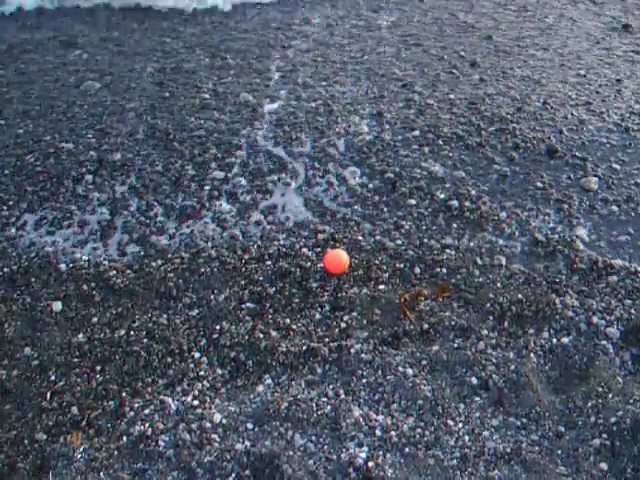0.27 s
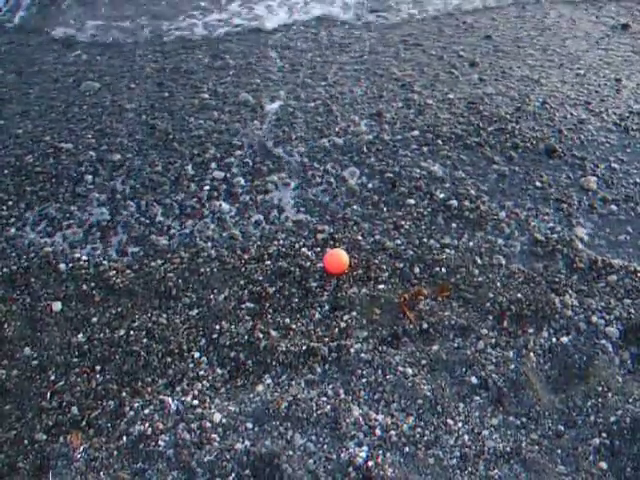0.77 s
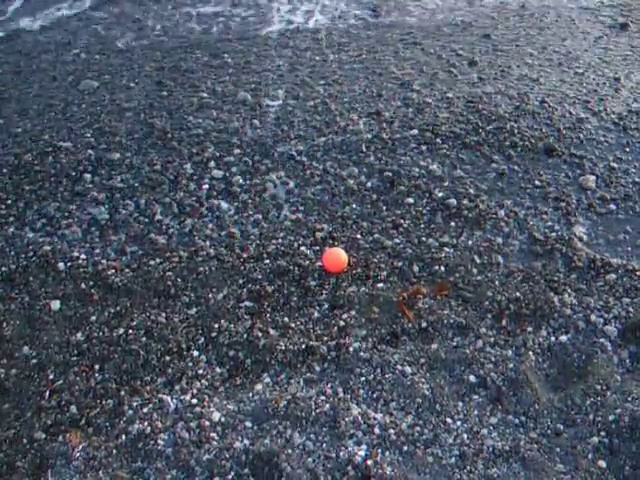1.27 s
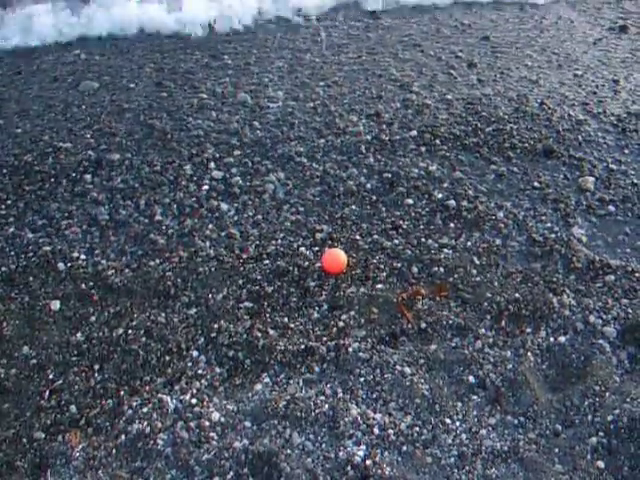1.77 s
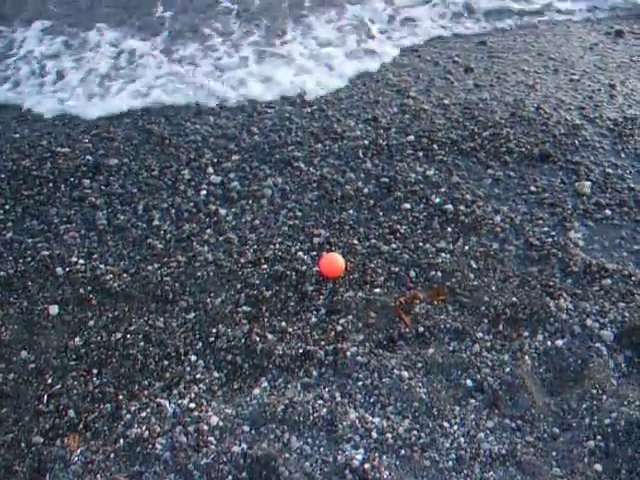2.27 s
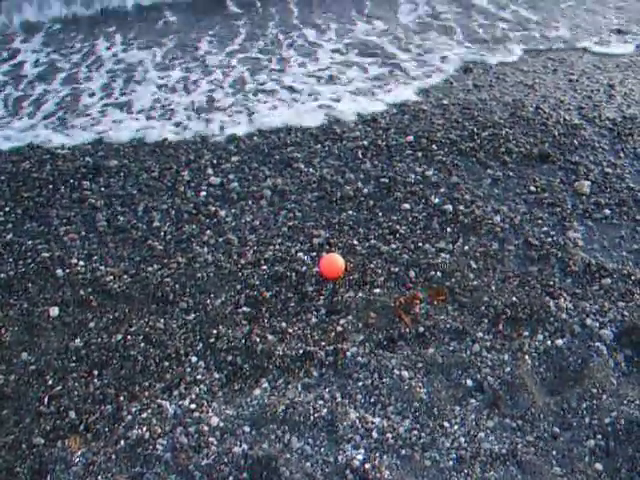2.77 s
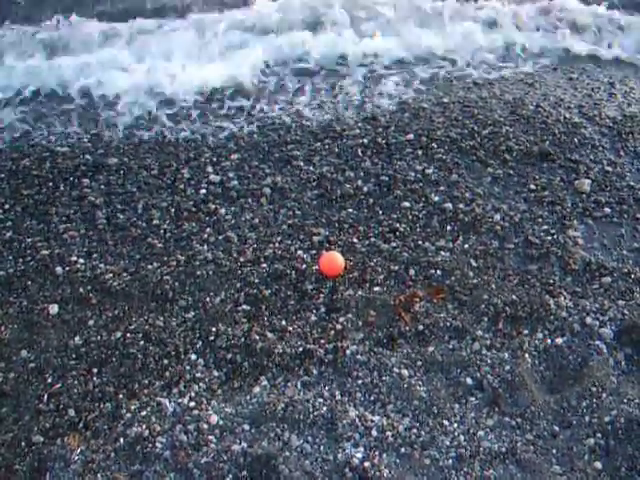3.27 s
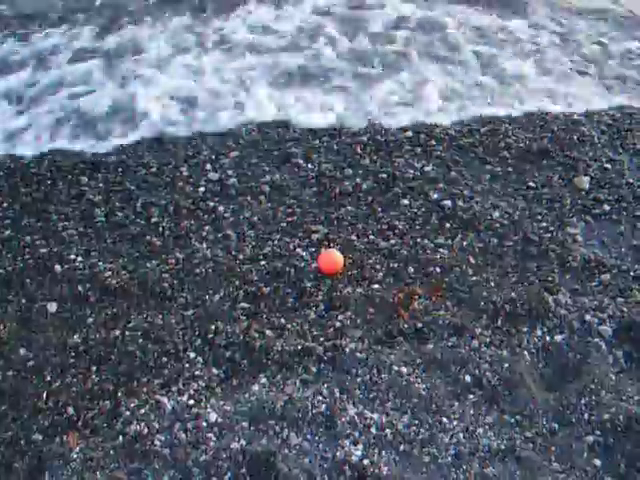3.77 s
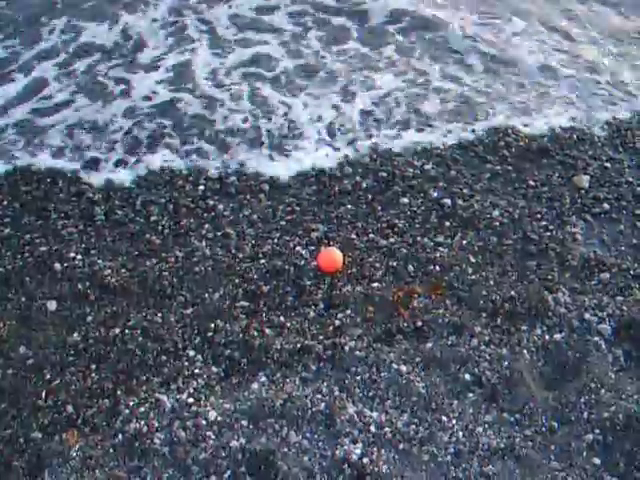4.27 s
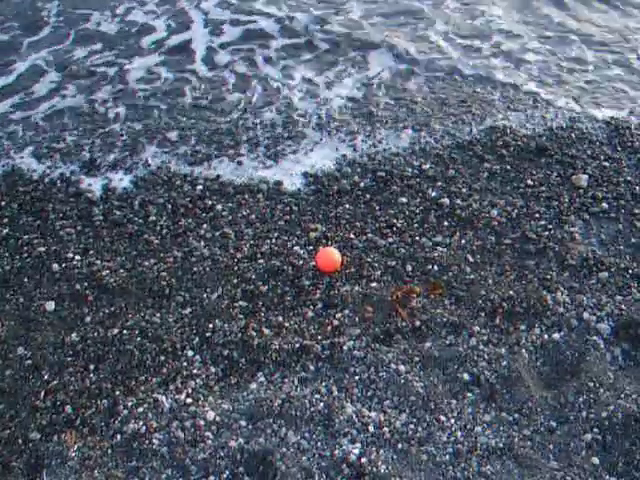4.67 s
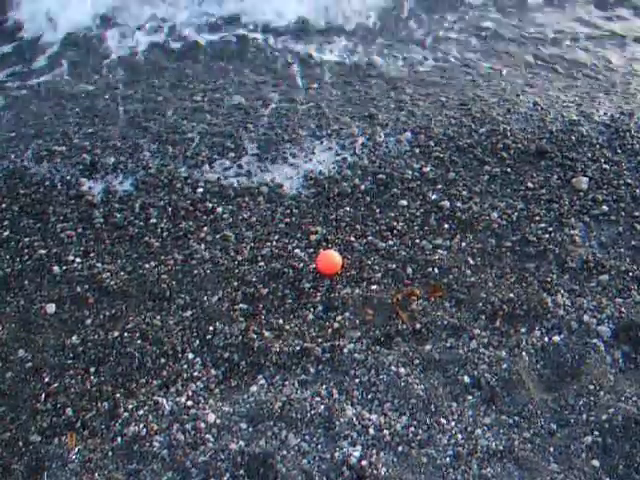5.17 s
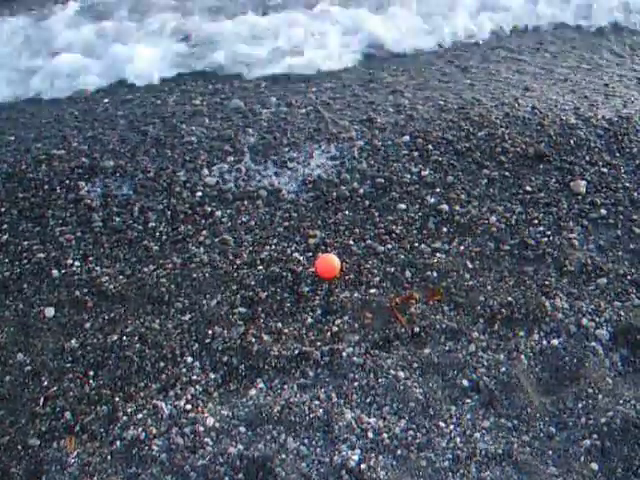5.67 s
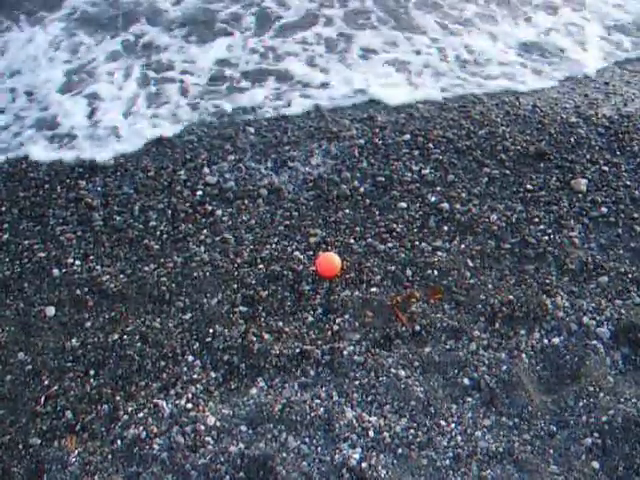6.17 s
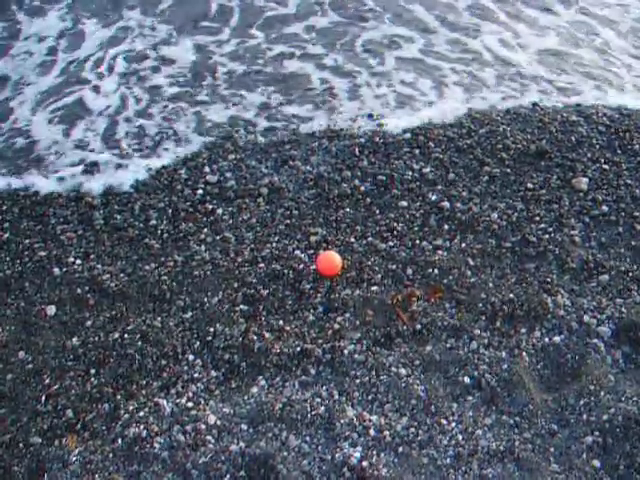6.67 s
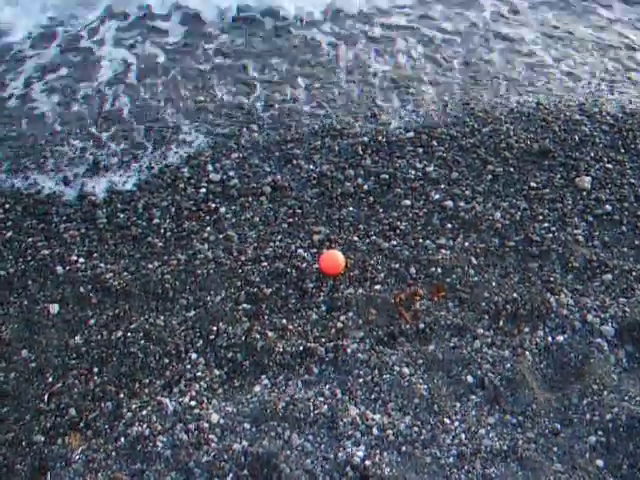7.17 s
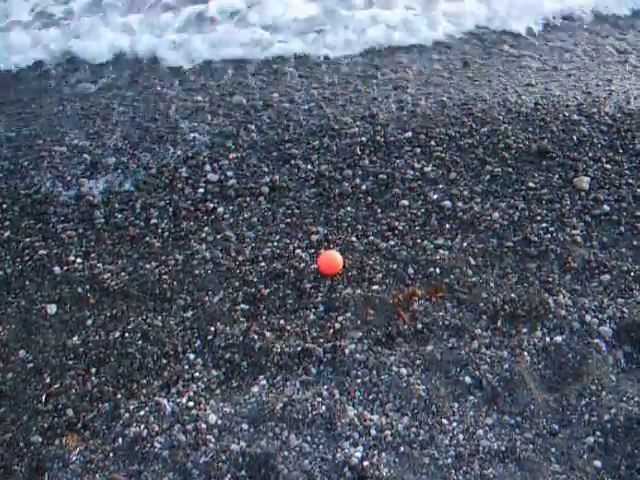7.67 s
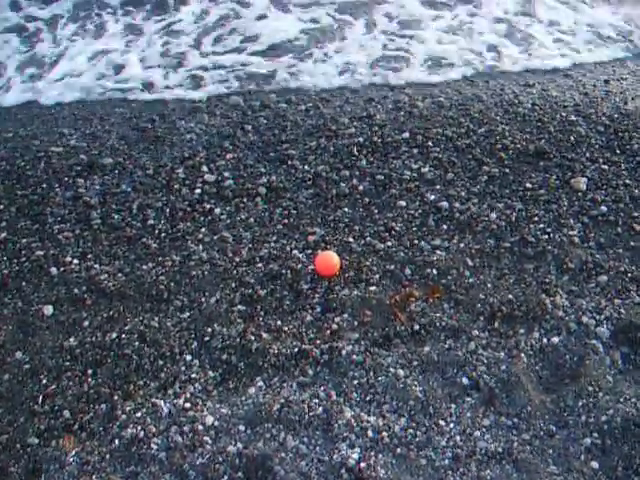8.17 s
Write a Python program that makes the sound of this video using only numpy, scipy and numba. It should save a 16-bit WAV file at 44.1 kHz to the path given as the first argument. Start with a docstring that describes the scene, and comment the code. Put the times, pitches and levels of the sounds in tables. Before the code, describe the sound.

Small waves run up and drain down a pebble beach a few metres away. The water makes a low, bubbling churn that swells around 1 to 2 seconds, is fullest near 3, and returns around 5 to 5.5 and 7 seconds. Foam fizzes over it, and the backwash rolls countless stones in a bright hiss of ticking gravel and clattering pebbles. This rattle rises at about 1.3 to 1.9 seconds and again near 3.3, sinks around 4, then comes back from 4.8 to 5.7 and from 6.6 to 7.3 before easing. A few single stones click sharply nearby, mostly in the first three seconds. Wind rumbles on the microphone in uneven gusts, with short low thumps near 0.7 and 2 seconds, the hardest buffeting around 3.6, and more fluttering from 5 to almost 8 seconds.

```python
"""A pebble beach, a few metres from the water's edge, where small waves run up and drain back.
Air trapped in the churning water resonates as bubbles, and the far smaller bubbles of the foam fizz.
The backwash rolls countless stones against each other, and each impact rings briefly.
Gusts shed eddies over the microphone; each one passes as a short dip in pressure."""
import sys
import numpy as np
from scipy import signal
from scipy.fft import rfft, irfft, next_fast_len
from scipy.io import wavfile
from scipy.ndimage import uniform_filter1d
from numba import njit

SR = 44100
rng = np.random.default_rng(int(sys.argv[2]) if len(sys.argv) > 2 else 0)


def wav_out(sig):
    """Save sig, one row per channel (or a flat mono array), as 16-bit PCM at SR to the path in sys.argv[1]."""
    wavfile.write(sys.argv[1], SR, np.round(np.clip(np.atleast_2d(sig).T, -1, 1) * 32767).astype(np.int16))


N = 371303
T = np.arange(N) / SR


def water(churn_db):
    """Bubble resonance: trapped air rings and rises in pitch, over the roar of breakers further out."""
    # spectrum of churning water: (frequency [Hz], gain [dB])
    water_spectrum = [(40, -9), (150, -7), (300, -3), (450, -2), (600, 0), (750, -1.5), (1000, -7),
                      (1200, -12), (1500, -22), (2200, -32.5), (5000, -34.5)]
    bubbles = grains(churn_db / 2, 169.5, 1920, cycles=3.05, spread_db=3, glide=0.22, count=15000)
    roar = rng.standard_normal(N)
    churn = unit(colour(bubbles, water_spectrum) + colour(roar, water_spectrum))
    # big pockets of air gurgle low, mainly where the churning is loud
    pockets = grains(churn_db / 2, 330, 620, cycles=4.9, spread_db=2.5, glide=0.079, count=3000)
    gurgle = colour(pockets, water_spectrum) * undb(-7 + .8 * (churn_db - churn_db.max()))
    return (churn + gurgle) * undb(churn_db + 2.5 + .5 * walk(14))


def shingle(gravel_db, pebble_db):
    """Impact sound: dragged by the water, fine gravel ticks and larger pebbles clatter lower."""
    # spectra of the gravel and of the pebbles: (frequency [Hz], gain [dB])
    gravel_spectrum = [(900, -26.5), (1800, -7.5), (3000, -3), (4000, -1.5), (5000, -1.5), (6000, -2),
                       (7200, -1), (8000, -9.5), (9000, -16.5)]
    pebble_spectrum = [(600, -17), (1100, -0.5), (1500, -3), (2000, 0.5), (2500, -3.5), (3500, -6),
                       (5000, -8.5), (8000, -24)]
    ticks = grains(gravel_db / 2, 1546, 8980, cycles=2.05, spread_db=3, glide=0, count=70000)
    clatter = grains(pebble_db / 2, 807, 5920, cycles=2.25, spread_db=2.5, glide=0, count=50000)
    # further along the shore the ticks merge into an even hiss
    hiss = colour(rng.standard_normal(N), gravel_spectrum)
    crowd = unit(colour(ticks, gravel_spectrum) + undb(-1.5) * hiss)
    nearest = grains(gravel_db, 1800, 8400, cycles=16, spread_db=3.5, glide=0, count=350)
    fine = (crowd + undb(-20) * nearest) * undb(gravel_db + 1.06 + 0.78 * walk(45))
    coarse = colour(clatter, pebble_spectrum) * undb(pebble_db + 3.5 + 0.44 * walk(25))
    return fine + coarse


def slides():
    """Granular slip: the level added to the gravel [dB] as small heaps of stones let go."""
    # slides: (start [s], duration [s], added level [dB])
    slips = [(1.17, .08, 2), (1.69, .05, 2), (2.48, .04, 3), (2.787, .04, 1.5), (4.62, .06, 2.5),
             (4.89, .04, 1.5), (5.379, .05, 2), (6.6, .32, 1), (8.29, .12, 2)]
    return sum(db * swell(start, length, attack_s=.02, release_s=.02) for start, length, db in slips)


def knocks():
    """Damped free vibration: single near stones strike with a dry crack and a brief ring."""
    # impacts: (time [s], relative level [dB], frequency [Hz])
    impacts = [(0.609, -14, 2650), (.737, -20, 2060), (1.164, -18, 2720), (1.582, -15, 3530),
               (2.569, -19, 2630), (4.436, -19, 5630), (5.113, -16, 2680), (7.082, -16, 7900)]
    start, db, hz = np.transpose(impacts).copy()
    crack = ring(start, hz, cycles=np.full(len(start), .8), size=undb(db - 4), glide=0.)
    tone = ring(start, hz, cycles=np.full(len(start), 9.), size=undb(db - 5), glide=0.)
    return crack + tone


def foam(foam_db):
    """Small cavities resonate high: millimetre bubbles in the foam burst and fizz."""
    # spectrum of the fizz: (frequency [Hz], gain [dB])
    foam_spectrum = [(1500, -23.5), (2200, -5.5), (2700, -1), (3200, -5), (4000, -11.5), (7000, -31)]
    fizz = grains(foam_db / 2, 1701, 4506, cycles=7.4, spread_db=1.5, glide=0.048, count=16000)
    return colour(fizz, foam_spectrum) * undb(foam_db - .3)


def wind(gust_db, count=900):
    """Turbulent pressure rumbles on the microphone; faster air makes the eddies louder and sharper."""
    # spectrum of the turbulence: (frequency [Hz], gain [dB])
    rumble_spectrum = [(10, -10), (25, -3), (60, -2.5), (110, 1), (160, 0.5), (220, -0.5), (320, -6.5),
                       (500, -17), (900, -36), (2000, -57)]
    jitter, width, strength = rng.random((count, 3)).T
    times = (np.arange(count) + 2 * jitter) / count * N / SR  # about a hundred eddies a second
    local_db = np.interp(times, T, gust_db)
    hz = np.clip(115 * undb(0.38 * (local_db + 21)) * 2 ** (1.3 * (width - .5)), 40, 300)
    vortices = eddies(times, undb(local_db + 5 + 7.4 * (strength - .5)), hz)
    rumble = colour(rng.standard_normal(N), rumble_spectrum) * undb(gust_db - 3 + 1.6 * walk(30))
    # the microphone follows neither the slowest changes in pressure nor eddies smaller than its port
    passband = signal.butter(2, [17, 1700], "band", fs=SR, output="sos")
    return signal.sosfilt(passband, rumble + vortices + buffets())


def buffets(count=8, gap_s=.016, scatter_db=3):
    """Vortex shedding: each buffet is its hardest eddy, then, if it lasts, more at uneven gaps."""
    # hard buffets: (start [s], duration [s], peak level [dB], centre frequency [Hz])
    eddy_trains = [(.547, .005, -8, 149), (0.661, .005, -9, 148), (0.718, .005, -6, 190),
                   (1.521, .005, -6, 150), (1.984, .005, -7.5, 200), (2.057, .1, -7.5, 160),
                   (2.335, .005, -13.5, 190), (2.873, .005, -9, 150), (3.399, .005, -8.5, 180),
                   (3.625, .025, 0, 290), (3.686, .005, -5.5, 380), (3.742, .025, -7.5, 354),
                   (3.803, .005, -5.5, 318), (6.26, .055, -8.5, 169), (6.324, .005, -7.5, 248),
                   (6.428, .055, -4.5, 169), (6.827, .005, -8.5, 160)]
    pressure = np.zeros(N)
    for start, length, db, hz in eddy_trains:
        jitter, weaker, width = rng.uniform(-1.035, 1, (3, count)) * (np.arange(count) > 0)
        delay = gap_s * (np.arange(count) + 0.312 * jitter)
        size = undb(db - scatter_db * np.abs(weaker)) * (delay < length)
        pressure += eddies(start + delay, size, hz * 2 ** (0.26 * width))
    return pressure


def eddies(times, size, hz):
    """Vortex pressure: each eddy is a narrow, low core between two broad, slight rises."""
    samples = (times * SR).astype(int)[:, None] + np.arange(-700, 701)
    radius_sq = (2 * np.pi * hz[:, None] * (samples / SR - times[:, None])) ** 2
    dips = size[:, None] * (radius_sq - 1) / (1 + radius_sq) ** 2 * np.hanning(samples.shape[1])
    return np.bincount(np.clip(samples, 0, N + 1).ravel(), dips.ravel(), N + 2)[1:N + 1]


def gusts(breeze_db=-38.5, flutter_db=1.5):
    """Addition of powers: gusts and a light breeze sum to one fluttering wind level [dB]."""
    # gusts: (start [s], duration [s], level [dB])
    puffs = [(0.15, .03, -24.5), (.23, 0.037, -19.5), (.48, .08, -26), (0.633, 0.21, -28),
             (0.927, 0.15, -34), (1.428, 0.16, -28), (1.9, 0.019, -21.5), (2.026, 0.13, -19.5),
             (2.536, 0.16, -28), (2.788, 0.074, -19.5), (2.933, 0.028, -19.5), (3.292, 0.13, -23),
             (3.496, .33, -18.5), (3.844, .2, -21.5), (4.108, .11, -25.5), (4.47, .05, -27.5),
             (4.779, .16, -23), (4.96, 0.224, -17.5), (5.218, 0.256, -23), (5.562, 0.038, -19.5),
             (5.713, 0.069, -17.5), (5.913, 0.1, -24.5), (6.086, 0.067, -19), (6.208, 0.14, -20.5),
             (6.39, 0.39, -24), (6.82, 0.15, -22), (7.003, 0.88, -24)]
    power = sum((undb(db) * swell(start, length, attack_s=.019, release_s=.02)) ** 2
                for start, length, db in puffs)
    return 10 * np.log10(undb(breeze_db) ** 2 + power) + flutter_db * walk(24)


def grains(density_db, low_hz, high_hz, cycles, spread_db, glide, count):
    """Incoherent sum: tiny rings at even mean power, crowded when active, distinct when calm; rms 1."""
    when, pitch, strength, length, sign = rng.random((count, 5)).T
    density = undb(density_db)
    start = np.interp(when, np.cumsum(density) / density.sum(), T)
    hz = low_hz + (high_hz - low_hz) * pitch
    scatter = undb(spread_db * np.minimum(-np.log(1 - strength), 5))
    size = scatter * np.sqrt(hz / np.interp(start, T, density)) * np.sign(sign - .5)
    return unit(ring(start, hz, cycles * (.5 + length), size, float(glide)))


@njit
def ring(start, hz, cycles, size, glide):
    """Damped oscillators: each falls to 1 / e in its cycles; pitch rises by the fraction glide in all."""
    out = np.zeros(N)
    for k in range(len(start)):
        life = cycles[k] * SR / hz[k]
        steps = int(5 * life)
        pole = np.exp(2j * np.pi * hz[k] / SR - 1 / life)
        bend = np.exp(2j * np.pi * hz[k] / SR * glide / max(steps, 1))
        phasor = size[k] + 0j
        first = max(int(start[k] * SR), 0)
        for i in range(first, min(first + steps, N)):
            out[i] += phasor.imag
            phasor *= pole
            pole *= bend
    return out


def colour(x, spectrum):
    """Spectral shaping by (frequency [Hz], gain [dB]) points; rms 1."""
    hz, db = np.transpose(spectrum)
    size = next_fast_len(N)
    bin_hz = np.maximum(np.arange(size // 2 + 1) * SR / size, 1)
    gain = undb(np.interp(np.log(bin_hz), np.log(hz), db))
    return unit(irfft(rfft(x, size) * gain, size)[:N])


def walk(rate_hz):
    """Random modulation: ramps between values drawn rate_hz times a second; rms 1."""
    hold = max(int(SR / rate_hz), 2)
    held = rng.standard_normal(4096)[np.arange(N) // hold % 4096]
    return unit(uniform_filter1d(held, hold))


def swell(start, length, attack_s, release_s):
    """Exponential envelope: rises to 1 at start, holds, then dies away."""
    outside = np.maximum(start - T, 0) / attack_s + np.maximum(T - start - length, 0) / release_s
    return np.exp(-np.minimum(outside, 20))


def curve(points):
    """Linear interpolation of (time [s], level [dB]) points."""
    return np.interp(T, *np.transpose(points))


def undb(db):
    """Decibels to amplitude ratio."""
    return 10 ** (np.asarray(db) / 20)


def unit(x):
    """Normalisation to rms 1."""
    return x / np.sqrt(np.mean(x ** 2))


def scene():
    """Superposition: water, stones and foam in front, and wind on the microphone."""
    # low churning roar of the waves, plus some wind noise during gusts: (time [s], level [dB])
    churn_levels = [(0.0, -32), (0.61, -33), (0.84, -29), (1.81, -28), (2.3, -35), (2.67, -26), (2.91, -29),
                    (2.95, -25), (3.8, -30), (3.82, -36), (4.74, -34), (4.9, -28), (5.04, -32), (5.44, -27),
                    (5.86, -34), (6.54, -37), (6.56, -32), (7.08, -28), (7.48, -33), (7.64, -29),
                    (8.04, -34), (8.42, -30)]
    # gravel wash and foam fizz, swelling with the waves and dipping briefly under strong gusts:
    # (time [s], level [dB])
    gravel_levels = [(0.0, -33), (0.42, -34), (0.7, -37), (1.29, -30), (1.85, -31), (2.23, -40),
                     (2.84, -31), (2.86, -34), (3.3, -28), (3.37, -32), (3.49, -31), (3.7, -40),
                     (4.38, -41), (4.43, -37), (4.53, -42), (4.76, -28), (4.97, -29), (5.07, -35),
                     (5.25, -29), (5.7, -31), (5.98, -37), (6.24, -36), (6.28, -41), (6.66, -31),
                     (6.99, -33), (7.11, -30), (8.18, -37), (8.42, -36)]
    fizz_levels = [(0.0, -36), (0.56, -39), (0.61, -33), (0.68, -37), (1.69, -31), (2.32, -39), (2.53, -34),
                   (3.26, -32), (4.24, -45), (4.48, -44), (4.9, -30), (5.04, -38), (5.18, -33), (5.65, -33),
                   (5.93, -40), (6.21, -39), (6.26, -44), (6.47, -43), (6.68, -35), (7.72, -36),
                   (8.16, -41), (8.42, -34)]
    churn_db, gravel_db, foam_db = curve(churn_levels), curve(gravel_levels), curve(fizz_levels)
    usual_gravel_db, usual_pebble_db, usual_foam_db = -33.5, -39, -35  # an ordinary wave
    # the clatter of the pebbles follows the levels of gravel and foam
    pebble_db = usual_pebble_db + .6 * (gravel_db - usual_gravel_db) + .55 * (foam_db - usual_foam_db)
    slide_db = slides()
    stones = shingle(gravel_db + slide_db, pebble_db + 1.4 * slide_db)  # slides move big stones more
    return (water(churn_db) + stones + foam(foam_db) + knocks() + wind(gusts()))[None]


def record(dry, cutoff_hz=8550):
    """Soft saturation rounds the strongest peaks, and a low-pass filter cuts the top."""
    rounded = np.tanh(0.88 * dry) / 0.91
    low_pass = signal.firwin(161, cutoff_hz, window=("kaiser", 8), fs=SR)
    return signal.fftconvolve(rounded, low_pass[None], mode="same")


dry = scene()
out = record(dry)
wav_out(out)
```